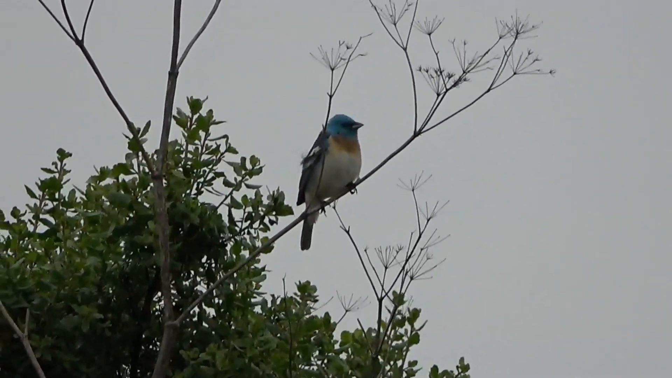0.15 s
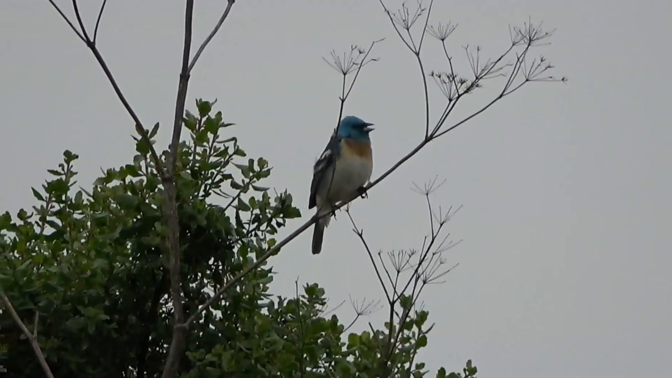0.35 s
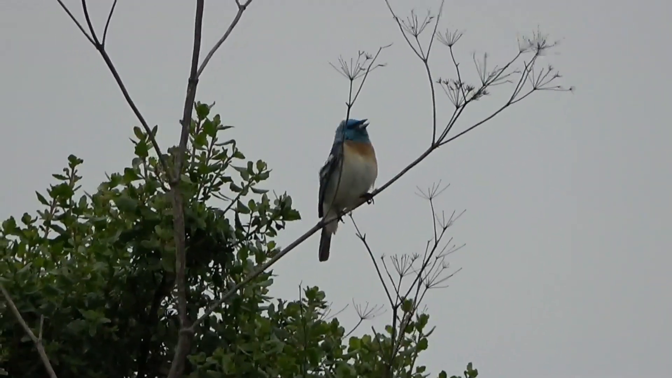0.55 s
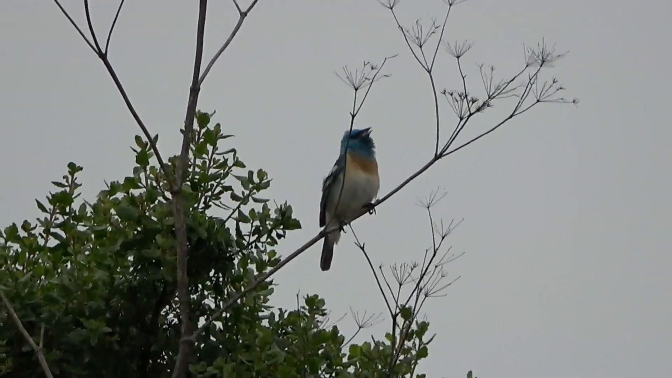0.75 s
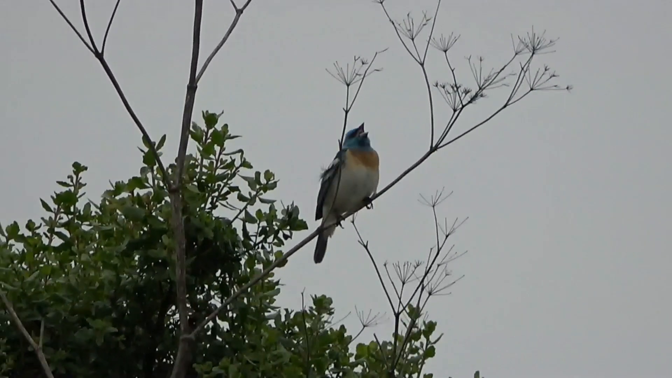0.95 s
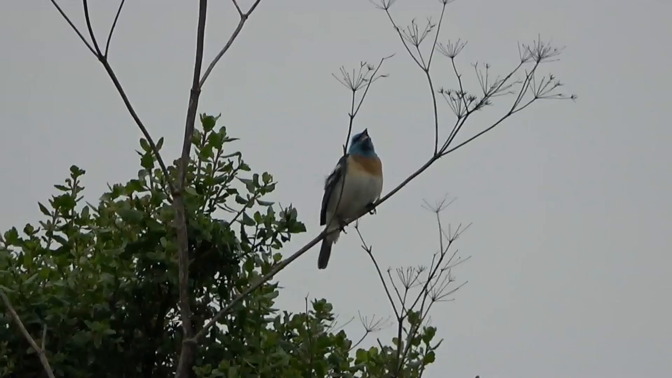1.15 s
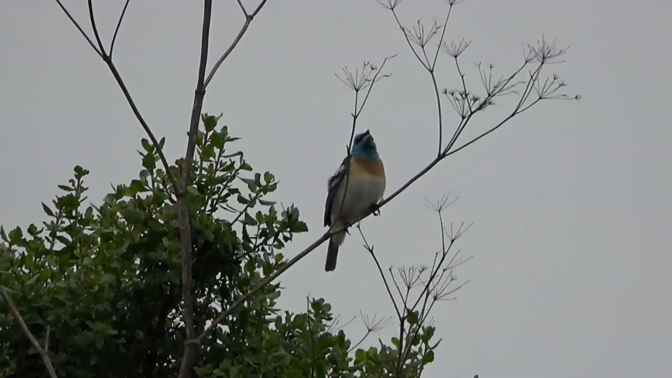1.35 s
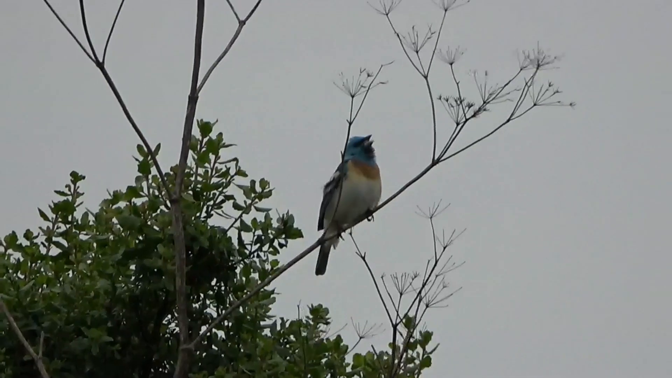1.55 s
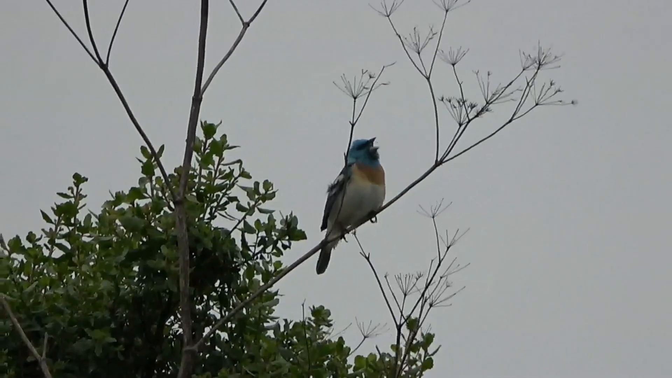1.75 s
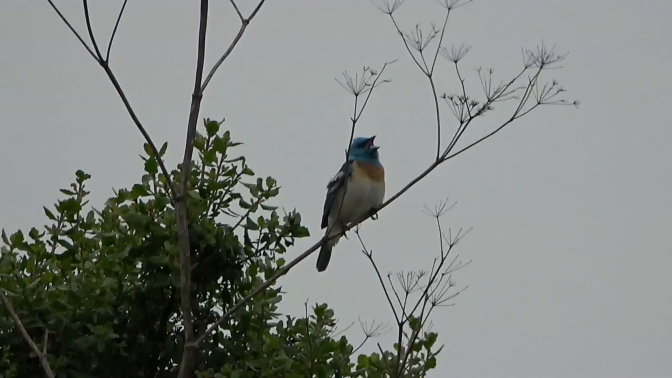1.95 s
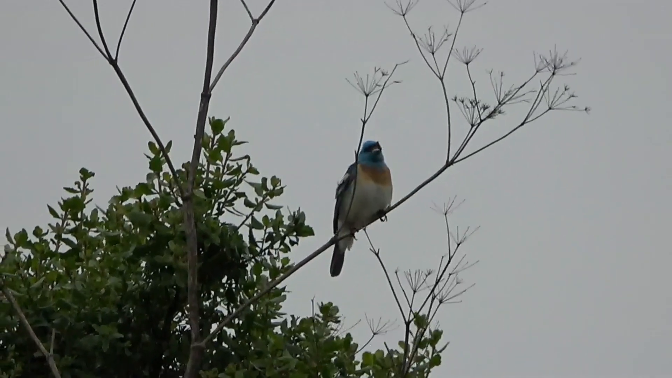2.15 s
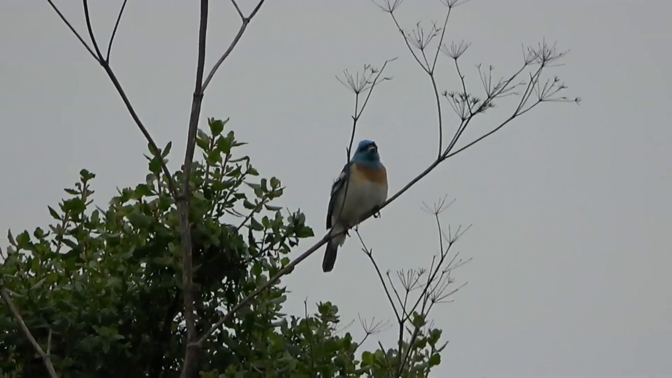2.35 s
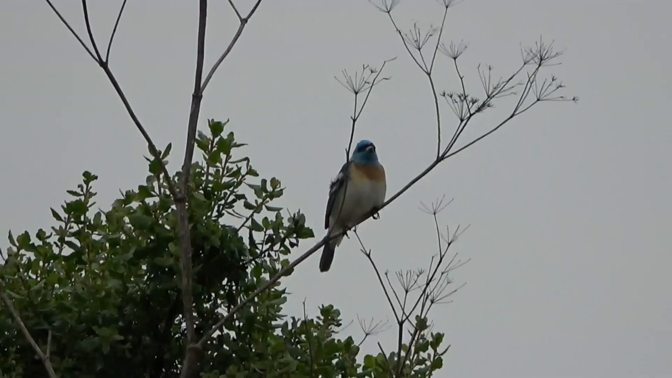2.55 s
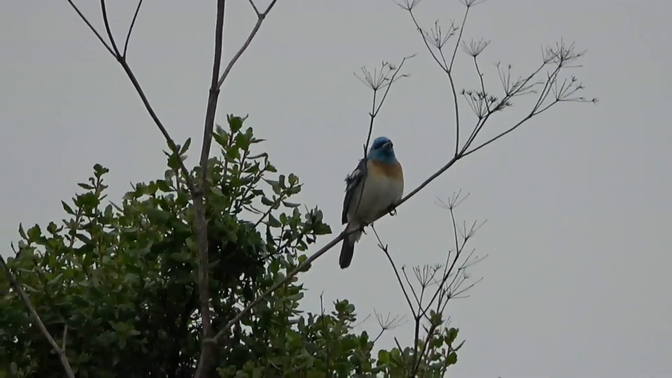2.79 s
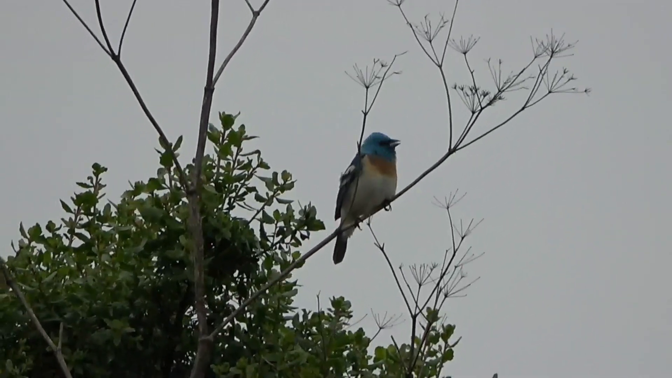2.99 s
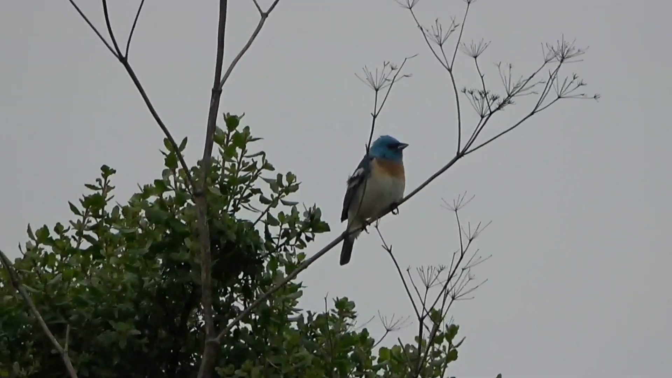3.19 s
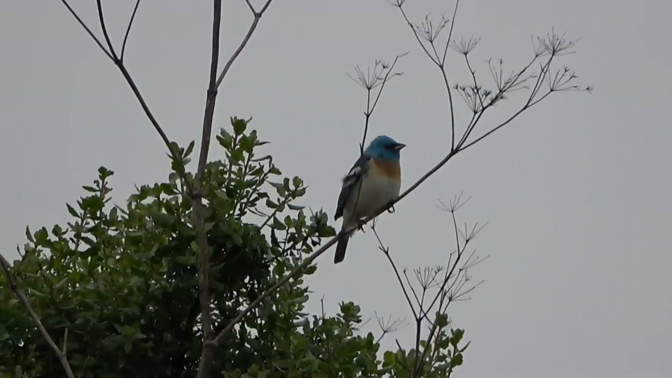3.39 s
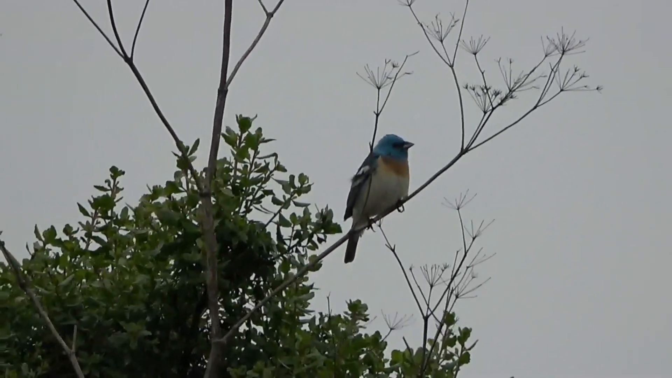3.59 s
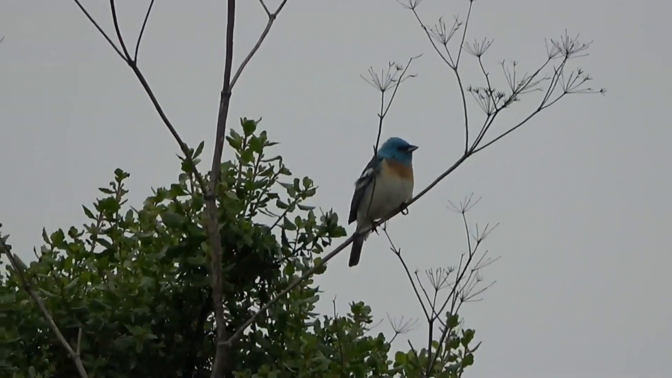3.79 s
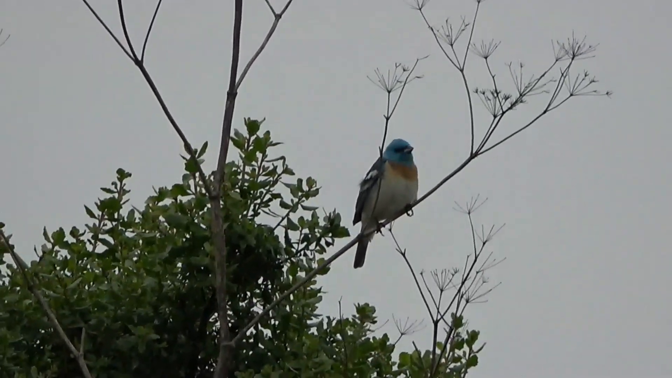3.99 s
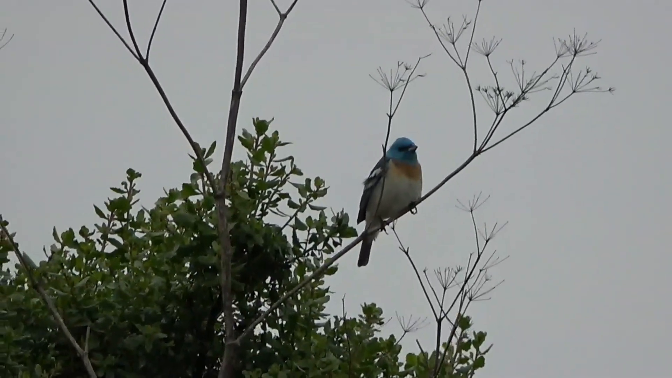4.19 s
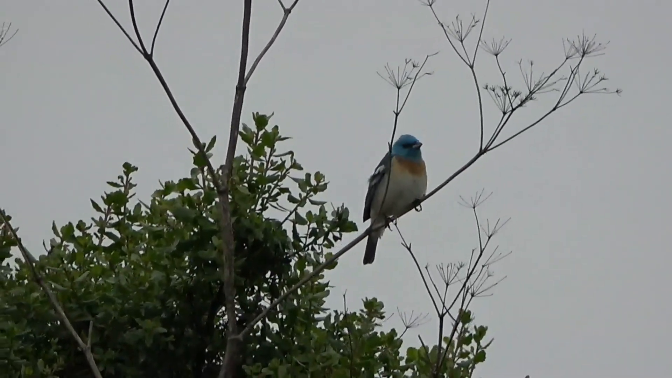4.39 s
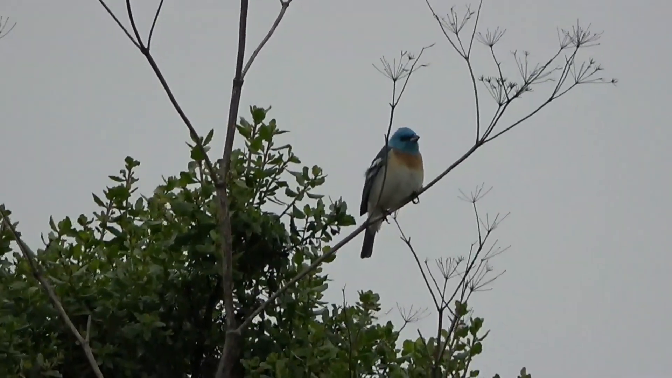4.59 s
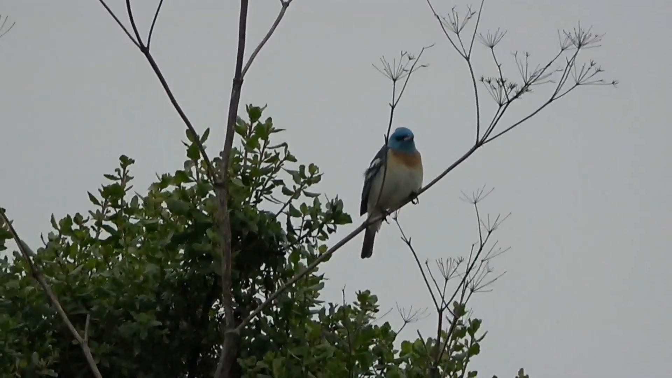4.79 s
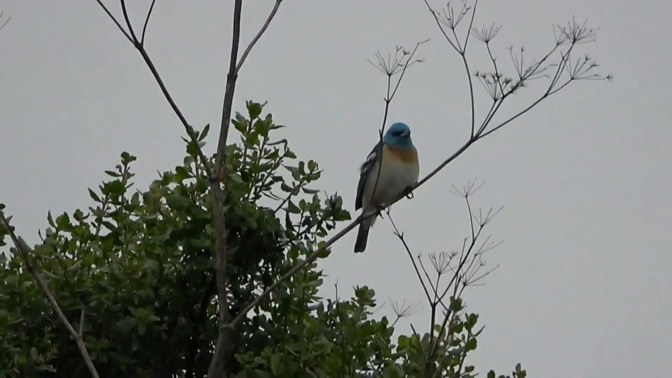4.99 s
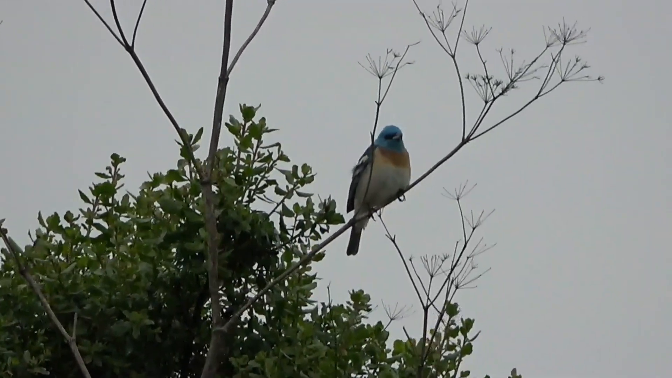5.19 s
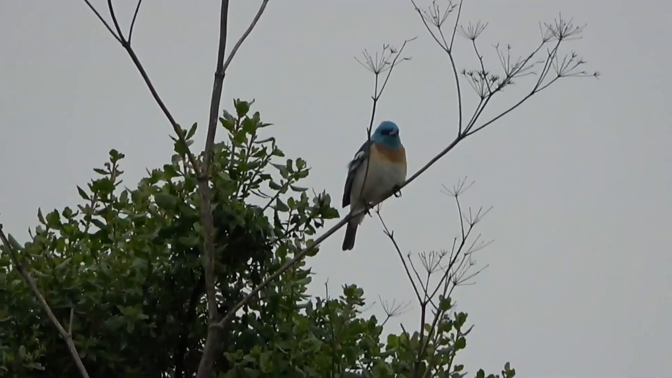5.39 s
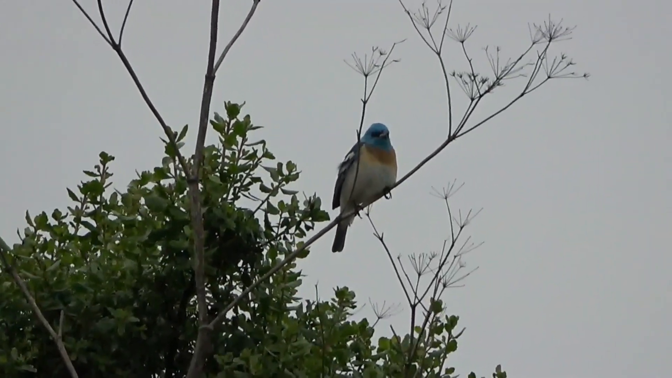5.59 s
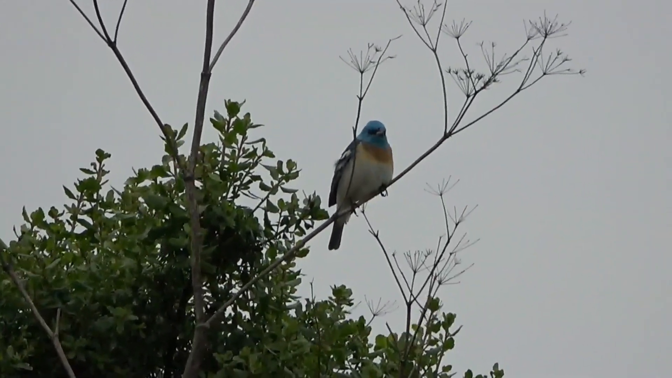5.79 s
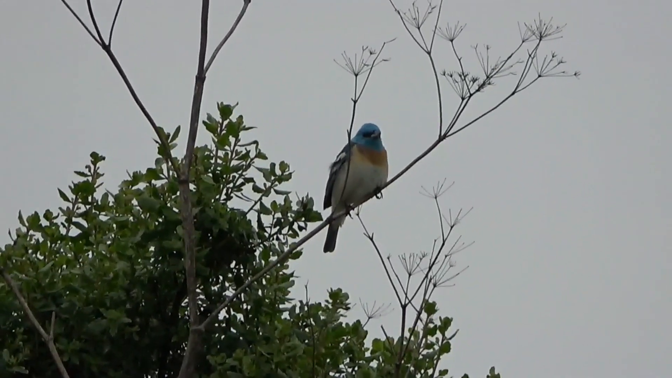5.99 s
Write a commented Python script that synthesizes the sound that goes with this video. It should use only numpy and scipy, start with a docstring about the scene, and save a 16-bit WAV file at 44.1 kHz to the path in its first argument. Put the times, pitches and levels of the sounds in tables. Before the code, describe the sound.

A small songbird sings a fast jumble of high sweeps, trills and buzzes, then a softer second song, over gusty wind rumbling on the microphone.

```python
"""Open scrub with a perch among branches, in gusty wind: a bunting sings a long jumble, then a softer song.
Its syllables are swept sines, some from both sides of the syrinx at once, returned by branches and bushes.
For the second song the head is turned: it leans to the right and comes back more from the bushes.
Another bird whistles far off (falling sines), a hoarse band of noise swells once in the distance,
gusts rumble on the microphone as octaves of noise, and a small knock close by rings damped modes."""
import sys
import numpy as np
from scipy import signal
from scipy.fft import rfft, irfft
from scipy.io import wavfile
from scipy.ndimage import uniform_filter1d, map_coordinates

SR = 44100
rng = np.random.default_rng(int(sys.argv[2]) if len(sys.argv) > 2 else 0)


def output_pcm(signal):
    """Save a mono or channel-first signal as 16-bit PCM at the path in sys.argv[1].

    Samples are clipped to [-1, 1] before scaling.
    """
    pcm = np.clip(np.atleast_2d(signal).T, -1, 1) * 32767
    wavfile.write(sys.argv[1], SR, np.round(pcm).astype(np.int16))


N = 266584


def from_db(db):
    """Decibels become an amplitude factor."""
    return 10 ** (np.asarray(db) / 20)


def rms_one(x):
    """Scale a sound to an rms of 1."""
    return x / np.sqrt(np.mean(x ** 2) + 1e-20)


def add(track, start_s, sound):
    """Mix a sound into a track."""
    i = max(round(start_s * SR), 0)
    track[i:i + len(sound)] += sound[:max(N - i, 0)]


def pan(x, left_db):
    """Make the left channel louder than the right by left_db."""
    return x * from_db([[left_db / 2], [-left_db / 2]])


def drift(per_s, size):
    """Smooth random wander of spread about 1, with per_s random points a second."""
    steps = np.arange(size) * per_s / SR
    return map_coordinates(rng.standard_normal(4096), [steps], order=3, mode="wrap")


def noise(spectrum, side_db):
    """Stereo noise of a given colour, mostly alike in both channels; rms 1."""
    hz, db = np.transpose(spectrum)
    bins = np.maximum(np.arange(N // 2 + 1) * SR / N, 1)
    colour = from_db(np.interp(np.log(bins), np.log(hz), db))
    mid, side = irfft(rfft(rng.standard_normal((2, N))) * colour, N)
    return rms_one(mid + from_db(side_db) * side * [[1], [-1]])


def scrub(x, wet_db, t60=0.28, twig_db=-22):
    """Nearby twigs scatter the sound at once; the bushes around return a faint longer tail."""
    twig_t60 = 0.025
    t = np.arange(SR // 2) / SR
    twigs = from_db(twig_db - 60 * t / twig_t60) / np.sqrt(twig_t60)
    bushes = from_db(wet_db - 60 * t / t60) / np.sqrt(t60)
    scale = np.sqrt(2 * np.log(1000) / SR)
    mid, side = rng.standard_normal((2, len(t))) * (twigs + bushes) * scale
    # leaves and twigs return short waves best
    short_waves = signal.butter(1, 3500, "high", fs=SR, output="sos")
    echoes = signal.sosfilt(short_waves, mid + 0.5 * side * [[1], [-1]])
    return x + signal.fftconvolve(x[None], echoes, axes=1)[:, :N]


def whistle(hz, db, overtone_db, undertone_db=-70, shimmer_db=2.0, edge_s=0.00097,
            rasp_db=-35, rasp_flicker_db=4, break_db=6, fifth_db=-8):
    """One voice: a near sine with slight tremor, faint octave and quick edges; half-pitch lines make it hoarse."""
    size = len(hz)
    tremor = 0.004  # share of the pitch
    phase = 2 * np.pi * np.cumsum(hz * (1 + tremor * drift(714, size))) / SR
    overtone = from_db(overtone_db) * np.sin(2 * phase) * (hz < SR / 4)
    half_lines = np.sin(phase / 2) + from_db(fifth_db) * np.sin(phase + phase / 2)
    # the half-pitch lines come and go in spurts
    undertone = from_db(undertone_db + break_db * np.tanh(drift(152, size))) * half_lines
    tone = np.sin(phase) + overtone + undertone
    # the air jet roughens the tone in short spurts
    rasp = from_db(rasp_db + rasp_flicker_db * drift(183.5, size)) * drift(8000, size)
    to_edge_s = np.minimum(np.arange(size), np.arange(size)[::-1]) / SR
    gate = np.sin(np.pi / 2 * np.minimum(to_edge_s / edge_s, 1)) ** 2
    return tone * (1 + rasp) * gate * from_db(db + shimmer_db * drift(297.2, size))


def syllables(shape, cues, overtone_db=-40, **timbre):
    """A learnt gesture is repeated: each cue stretches its time, scales its pitch and offsets its level."""
    out = np.zeros(N)
    s, hz, db = np.transpose(shape)
    for start, length, ratio, gain_db in cues:
        along = np.linspace(s[0], s[-1], max(int(length * SR), 2))
        # muscles round the corners
        pitch = uniform_filter1d(np.interp(along, s, hz), size=90, mode="nearest")
        level_db = gain_db + np.interp(along, s, db)
        add(out, start, whistle(ratio * pitch, level_db, overtone_db, **timbre))
    return out


# colour of the steady outdoor background: f/Hz, relative level/dB
AIR_COLOUR = [(180, -6.5), (300, -15.5), (437, -4), (730, -4), (957, -12.5), (1350, -11.5), (1570, -19.5),
              (2670, -22.5), (11000, -23.5), (14300, -72)]


def air():
    """Steady outdoor background: coloured noise, wide in stereo."""
    return from_db(-56) * noise(AIR_COLOUR, side_db=-8.5)


# low wind noise between gusts, its deep part thinned near 0.92 s:
# t/s, level/dB, tilt/dB per octave from 180 Hz (wind() steepens it below)
LOW_WIND_COURSE = [(0, -49.5, -2.5), (0.921, -47.5, 9), (1.2, -48.5, -3), (2.1, -47.5, -5.5),
                   (2.5, -55.5, -6.5), (3.1, -44, 0.5), (4.502, -47.5, 0.5), (6.04, -50, 0.5)]
# gusts; small eddies tilt them bright, big ones deep:
# start t/s, hold t/s, level/dB, tilt/dB per octave from 180 Hz (wind() steepens it below)
GUST_CUES = [(0.095, 0.14, -50, -8), (0.346, 0.22, -38, -6), (0.572, 0.074, -26, 2),
             (0.701, 0.073, -23.5, 4.5), (0.798, 0.053, -28.5, 2.5), (1.701, 0.077, -43, -6),
             (1.838, 0.069, -31, 0.5), (1.991, 0.042, -34.5, -3.5), (2.249, 0.11, -37.5, 2.5),
             (2.696, 0.018, -33, -4), (2.942, 0.062, -35, 0), (3.169, 0.032, -33.5, 3.5),
             (3.23, 0.057, -27.5, 5.5), (3.481, 0.14, -40, 3), (3.636, 0.16, -35.5, 6),
             (3.948, 0.23, -44.5, 4), (4.12, 0.017, -26.5, 6), (4.17, 0.21, -35, 3),
             (4.618, 0.053, -44.5, -4.5), (4.722, 0.041, -36.5, -2), (4.849, 0.084, -40.5, 2),
             (5.45, 0.11, -35, 2.5), (5.598, 0.074, -40.5, 2.5), (5.818, 0.022, -42.5, 5)]


def airflow_db(t, tilt_octaves, attack_s=0.038, release_s=0.032, sag_db_per_s=11.5):
    """Strength of one octave of wind noise: the low wind plus every gust with attack, sagging hold, release."""
    s, db, tilt = np.transpose(LOW_WIND_COURSE)
    power = from_db(np.interp(t, s, db + tilt * tilt_octaves)) ** 2
    for start, length, db, tilt in GUST_CUES:
        age = t - start
        # a gust swells or dies by 20 dB in one attack or release time
        outside = np.maximum(-age, 0) / attack_s + np.maximum(age - length, 0) / release_s
        shape_db = -20 * np.minimum(outside, 10) - sag_db_per_s * np.clip(age, 0, length)
        power = power + from_db(db + tilt * tilt_octaves + shape_db) ** 2
    return 10 * np.log10(power)


# octaves of turbulence: centre f/Hz, level/dB re airflow, left minus right level/dB
EDDY_OCTAVES = [(33.8, -24.5, -2), (77.6, -8.5, 2), (143.1, -4, 4), (260, -7.5, 6.5), (495, -21.5, 3),
                (1040, -52.5, 15.5)]
# single eddies that hit the microphone: t/s, peak level/dB before panning and the low-pass, f/Hz
BUFFET_CUES = [(0.597, -15, 144), (.613, -18, 185), (.701, -10.5, 205), (0.761, -14.5, 246),
               (1.837, -14, 124), (1.881, -14, 152), (2.714, -23, 118), (3.261, -21, 332)]


def wind(lumpy_db=3.0, side_db=-21, top_octaves=1.0, depth=1.62):
    """Octaves of turbulence swell with each gust; the hardest eddies arrive as a single push and pull."""
    t, out = np.arange(N) / SR, np.zeros((2, N))
    coarse_t = t[::40]
    lumps_db = lumpy_db * drift(80, N)
    for hz, db, left_db in EDDY_OCTAVES:
        octave = signal.butter(2, [hz / np.sqrt(2), hz * np.sqrt(2)], "band", fs=SR, output="sos")
        mid, side = rms_one(signal.sosfilt(octave, rng.standard_normal((2, N))))
        octaves = min(np.log2(hz / 180), top_octaves)
        # the deepest octaves depend most on the size of the eddies
        tilt_octaves = min(octaves, depth * octaves)
        flow_db = np.interp(t, coarse_t, airflow_db(coarse_t, tilt_octaves))
        rumble = mid + from_db(side_db) * side * [[1], [-1]]
        out += pan(from_db(db + flow_db + lumps_db) * rumble, left_db)
    for at, db, hz in BUFFET_CUES:
        u = np.clip(2 * np.pi * hz * (t - at), -10, 10)
        push_pull = u * np.exp((1 - u * u) / 2)
        out -= pan(from_db(db) * push_pull, left_db=3.5)
    return signal.sosfilt(signal.butter(2, 1300, fs=SR, output="sos"), out)


def far_rasp(hz=2050, at_s=3.46, spread_s=0.19, db=-69):
    """A faint hoarse band of noise swells and fades in the distance."""
    band = noise([(hz / 2, -45), (hz, 0), (hz * 2, -45)], side_db=-12)
    return band * from_db(db) * np.exp(-((np.arange(N) / SR - at_s) / spread_s) ** 2 / 2)


# whistles of a distant bird: start t/s, length t/s, first f/Hz, last f/Hz, level/dB at mid-whistle
FAR_WHISTLE_CUES = [(4.241, 0.07, 2220, 2160, -61.5), (4.382, 0.05, 3480, 3320, -68),
                    (4.666, 0.059, 2660, 2450, -65.5), (4.712, 0.03, 2060, 1950, -66),
                    (5.042, 0.1, 3450, 2920, -64.5)]


def far_bird(taper_db=9):
    """Another bird's plain falling whistles, each swelling and fading."""
    out = np.zeros(N)
    for start, length, first_hz, last_hz, db in FAR_WHISTLE_CUES:
        along = np.linspace(-1, 1, int(length * SR))
        hz = np.geomspace(first_hz, last_hz, len(along))
        add(out, start, whistle(hz, db - taper_db * along ** 2, overtone_db=-40))
    return out


# two strikes of a small hard knock: t/s, level/dB added to the modes
KNOCK_STRIKES = [(2.33, -19.5), (2.3341, -28)]
# modes of the knocked object: f/Hz, level/dB, t60/s
KNOCK_RING = [(450, -9, 0.013), (704, -2.5, 0.032), (880, -3.5, 0.025), (1193, -1.5, 0.028),
              (1760, -2, 0.015), (2870, -6.5, 0.0098), (3850, -2, 0.012), (6900, 13.5, 0.00057)]


def knock():
    """A short tap rings a few quickly damped modes."""
    out, t = np.zeros(N), np.arange(SR // 10) / SR
    ring = np.zeros(len(t))
    for k, (hz, db, t60) in enumerate(KNOCK_RING):
        ring += (-1) ** k * from_db(db - 60 * t / t60) * np.sin(2 * np.pi * hz * t)
    for s, db in KNOCK_STRIKES:
        add(out, s, from_db(db) * ring)
    return out


# Shapes of plain syllables: t/s, f/Hz, level/dB, all before the cue's stretch, ratio and gain
DIP_SHAPE = [(0.0, 6640, -24.5), (0.032, 5590, 0.5), (0.052, 4730, -5), (0.063, 3680, -2.5),
             (0.069, 3720, -5), (0.077, 5220, -2), (0.088, 5740, -18)]
SLUR_SHAPE = [(0.0, 6740, -22), (0.018, 7180.0, -9), (0.034, 7460.0, -17), (0.048, 6400.0, -8.5),
              (0.068, 5700.0, 4), (0.082, 5400.0, -2), (0.094, 5400.0, -24)]
CHIP_SHAPE = [(0.0, 5010, -10.5), (0.014, 5102, -4), (0.025, 4130.0, -13), (0.035, 3323, -25)]
FALL_SHAPE = [(0, 7560, -22), (.018, 6600, -4.5), (.034, 5060, 1), (.048, 4000, -1), (.064, 3550, -1),
              (.095, 3083, -16.5), (.11, 2550, -24)]
DROP_SHAPE = [(0.0, 5390, -15.5), (0.012, 5050, -4), (0.025, 4560, 2.5), (0.037, 3600, -3),
              (0.044, 3140, -21)]
HIGH_SLUR_SHAPE = [(0.0, 6640, -21), (0.011, 7960, -9), (0.026, 7400, -32), (0.04, 6560, -11.5),
                   (0.058, 6260, -1.5), (0.072, 5850, -11.5), (0.082, 5880, -5.5)]
STEEP_FALL_SHAPE = [(0.0, 7480, -25), (0.01, 6730.0, -7), (0.02, 5520.0, -5.5), (0.033, 4400, -4),
                    (0.05, 3820.0, -19), (0.075, 3070, -14.5), (0.092, 2650, -40)]
# short opening curl before the sawtooth trill, same columns
CURL_SHAPE = [(0, 5600, -28), (.012, 6300, -7), (.023, 6700, 5.5), (.029, 6600, -11)]
# When they are sung: start t/s, length t/s, f ratio, gain/dB
DIP_CUES = [(0.101, 0.086, 1, -39.5)]
SLUR_CUES = [(0.263, 0.1, 1, -41.5), (.492, 0.095, 1, -29.5)]
CHIP_CUES = [(0.406, 0.035, 0.95, -28)]
FALL_CUES = [(0.72, 0.12, 1.06, -24.5), (1.012, 0.1, 1.036, -23.5)]
DROP_CUES = [(4.463, 0.03, 0.94, -51.5), (4.583, 0.036, 1.03, -46), (4.697, 0.032, 1.02, -42.5),
             (4.925, 0.042, 0.962, -40), (5.157, 0.044, 0.91, -39)]
HIGH_SLUR_CUES = [(4.801, 0.08, 0.99, -33.5), (5.049, 0.078, 0.98, -37), (5.273, 0.077, 0.97, -37.5)]
STEEP_FALL_CUES = [(5.521, 0.096, 0.978, -27.5), (5.806, 0.098, 1.025, -31.5)]
CURL_CUES = [(1.182, 0.031, 0.98, -29)]


def pure_syllables():
    """Clean swept whistles, near sines with only a faint octave."""
    pure = [(DIP_SHAPE, DIP_CUES), (SLUR_SHAPE, SLUR_CUES), (CHIP_SHAPE, CHIP_CUES),
            (FALL_SHAPE, FALL_CUES), (CURL_SHAPE, CURL_CUES), (DROP_SHAPE, DROP_CUES),
            (HIGH_SLUR_SHAPE, HIGH_SLUR_CUES), (STEEP_FALL_SHAPE, STEEP_FALL_CUES)]
    return sum(syllables(shape, cues) for shape, cues in pure)


# rising syllable, then the other voice's flick that opens it: t/s, f/Hz, level/dB before the cue
RISE_SHAPE = [(0, 3003, -33), (.012, 3950, -9), (.034, 4034, -5.5), (.061, 4465, -7), (.079, 5090, 0),
              (.097, 5820, -4.5), (.109, 5900, -18)]
ONSET_SHAPE = [(0, 3800, 3), (.007, 4620, 5), (0.015, 5300, -11)]
# rises: start t/s, length t/s, f ratio, gain/dB
RISE_CUES = [(0.628, 0.095, 1, -26), (0.897, 0.11, 0.99, -22), (5.402, 0.11, 1.02, -30),
             (5.694, 0.11, 0.96, -34.5)]


def rises(onset_db=-19):
    """One voice sweeps upward while the other opens the note with a weaker flick."""
    onset_s = ONSET_SHAPE[-1][0]  # the flick keeps its own length
    onset_cues = [(s, onset_s, ratio, db + onset_db) for s, length, ratio, db in RISE_CUES]
    return syllables(RISE_SHAPE, RISE_CUES) + syllables(ONSET_SHAPE, onset_cues)


# whip and hook shapes: t/s, f/Hz, level/dB before the cue
WHIP_SHAPE = [(0, 3050, -27), (.004, 5000, -5), (.008, 7266, -11.5), (.014, 5610, 0.5), (.024, 4720, -4),
              (.037, 3550, -3.5), (.045, 2940, -25), (.058, 2360, -30)]
HOOK_SHAPE = [(0.0, 2560, -26), (0.02, 3200, -16), (0.028, 3560, -5), (0.036, 3850, -1), (0.045, 3860, 1.5),
              (0.052, 4000, -15)]
# their cues: start t/s, length t/s, f ratio, gain/dB
WHIP_CUES = [(1.475, 0.065, 0.99, -18), (1.64, 0.06, 1.003, -17.5), (1.798, 0.063, 0.97, -20)]
HOOK_CUES = [(1.548, 0.049, 0.98, -18.5), (1.704, 0.045, 0.97, -21.5), (1.865, 0.046, 0.961, -22)]


def whips():
    """Steep falls, roughened by the air jet, alternate with steadier rising hooks."""
    return syllables(WHIP_SHAPE, WHIP_CUES, rasp_db=-27) + syllables(HOOK_SHAPE, HOOK_CUES, shimmer_db=1.3)


# peak, spike and arc shapes: t/s, f/Hz, level/dB before the cue
PEAK_SHAPE = [(0.0, 3440, -9), (0.009, 4010, -4.5), (0.014, 4800, 0.5), (0.018, 5640, -9),
              (0.022, 4690, -7), (0.027, 3780, 3), (0.034, 3030, -20), (0.04, 3040, -27),
              (0.046, 3750, -13)]
SPIKE_SHAPE = [(0.0, 3320, -14), (0.011, 3760, -6), (0.019, 4840, -4), (0.023, 6100, -10.5),
               (0.027, 4260.0, -5), (0.033, 2810, -18.5)]
ARC_SHAPE = [(0.0, 3520, -18.5), (0.015, 5190, -8), (0.024, 6020, -8), (0.034, 6100, -11.5),
             (0.045, 5420, -6.5), (0.057, 3840, -16)]
# their cues: start t/s, length t/s, f ratio, gain/dB
PEAK_CUES = [(2.651, 0.046, 0.99, -31.5), (2.773, 0.036, 1.03, -32)]
SPIKE_CUES = [(2.697, 0.032, 1.06, -25.5), (2.811, 0.034, 1.02, -25)]
ARC_CUES = [(3.037, 0.057, 0.987, -33.5), (3.105, 0.0514, 1.014, -33.5)]


def hoarse_syllables():
    """Up-and-down chirps and arcs gain half-pitch lines and jet roughness, the arcs most."""
    chirp_timbre = dict(overtone_db=-28, undertone_db=-37, rasp_db=-23)
    peaks = syllables(PEAK_SHAPE, PEAK_CUES, **chirp_timbre)
    spikes = syllables(SPIKE_SHAPE, SPIKE_CUES, **chirp_timbre)
    arcs = syllables(ARC_SHAPE, ARC_CUES, overtone_db=-32, undertone_db=-16, rasp_db=-20)
    return peaks + spikes + arcs


# strokes of the sawtooth trill: start t/s, foot f/Hz, top f/Hz, level/dB at mid-stroke
STROKES = [(1.2128, 5000, 6710, -21.5), (1.243, 4750, 6280, -17.5), (1.2748, 4550, 6020, -17.5),
           (1.307, 4370, 6160, -19.5), (1.34, 4150, 5880, -19), (1.3744, 4250, 5840, -20)]


def trill(end_s=1.4065, snap_s=0.00595, turn_loss_db=9, turn_s=0.0071, fade_s=0.0053, fade_db=-18):
    """One whistle climbs through each stroke and snaps back, weakest at the foot."""
    t = np.arange(STROKES[0][0], end_s, 1 / SR)
    starts, foot, top, level = np.transpose(STROKES)
    tops_s = np.append(starts[1:], end_s) - snap_s
    turns_s = np.column_stack([starts, tops_s]).ravel()
    turns_hz = np.column_stack([foot, top]).ravel()
    hz = uniform_filter1d(np.interp(t, turns_s, turns_hz), size=90, mode="nearest")
    to_foot_s = np.abs(t[:, None] - starts).min(axis=1)
    foot_loss_db = turn_loss_db * np.exp(-(to_foot_s / turn_s) ** 2)
    closing_db = fade_db * np.exp((t - end_s) / fade_s)
    db = np.interp(t, (starts + tops_s) / 2, level) - foot_loss_db + closing_db
    out = np.zeros(N)
    add(out, t[0], whistle(hz, db, overtone_db=-36.5, rasp_db=-40))
    return out


# one steep downward flick: t/s, f/Hz, level/dB before the cue
FLICK_SHAPE = [(0, 7220, -12), (.005, 5200, -4), (.009, 4050, 2.5), (.013, 3280, -28)]
# groups of three flicks after each drop: start t/s, gain/dB
STUTTER_CUES = [(4.486, -51), (4.612, -45.5), (4.724, -42), (4.966, -42), (5.196, -43)]


def stutters(spacing_s=0.0112, length_s=0.012, last_db=-6):
    """A drop breaks into three steep downward flicks, the last one weaker."""
    flicks = [(s + k * spacing_s, length_s, 1, db + last_db * (k == 2))
              for s, db in STUTTER_CUES for k in range(3)]
    return syllables(FLICK_SHAPE, flicks)


# buzzes: start t/s, length t/s, reference t/s that sets the warble's phase (may lie before the start),
# first and last centre f/Hz, first and last warble rate f/Hz,
# swing f/Hz before narrowing, wander and cusp, loss at the tops level/dB, level/dB before losses
BUZZ_CUES = [(1.959, 0.12, 1.86, 6190, 5694, 109.9, 91.7, 496, 5.9, -19),
             (2.503, 0.12, 2.5, 7580, 7750, 59.3, 46.3, 1050, 12, -27.5),
             (2.891, 0.112, 2.906, 7470, 7660, 54, 48, 1050, 17, -33.5)]


def buzzes(cusp=0.16, taper_db=14, narrowing=0.53, swing_wander=0.13):
    """The pitch warbles fast and slows, with pointed tops at which the tone weakens and turns ragged."""
    out = np.zeros(N)
    for (start, length, phase_ref_s, first_hz, last_hz, first_rate, last_rate,
         swing_hz, top_loss_db, peak_db) in BUZZ_CUES:
        size = int(length * SR)
        ends = np.abs(np.linspace(-1, 1, size)) ** 3
        cycles = np.cumsum(np.linspace(first_rate, last_rate, size)) / SR
        turn = 2 * np.pi * (cycles - first_rate * (phase_ref_s - start))
        swing = swing_hz * (1 - narrowing * ends) * (1 + swing_wander * drift(82, size))
        warble = np.cos(turn) + cusp * np.cos(2 * turn)
        hz = np.linspace(first_hz, last_hz, size) + swing * warble
        tops = ((1 + np.cos(turn)) / 2) ** 2
        ragged_db = 3 * drift(1200, size)
        db = peak_db - taper_db * ends - tops * (top_loss_db + ragged_db)
        add(out, start, whistle(hz, db, overtone_db=-33.0))
    return out


# upper voice's double arch, sung in one breath, and lower voice's arch: t/s, f/Hz, level/dB before the cue
UPPER_ARCH_SHAPE = [(0, 4250, -11.5), (.011, 6000, -0.5), (.019, 7250, -9.5), (.031, 7600, -10.5),
                    (.044, 7300, -13), (.058, 5700, -5.5), (.071, 4700, -0.5), (.082, 5700, -0.5),
                    (.092, 7300, -10.5), (.102, 7600, -12), (.114, 6850, -8.5), (.128, 5350, -11.5)]
LOWER_ARCH_SHAPE = [(0.0, 3420, -14), (0.01, 4770, 0.5), (0.024, 4910, -5.5), (0.039, 4380.0, -5.5),
                    (0.052, 3510, -18)]
# their cues: start t/s, length t/s, f ratio, gain/dB
UPPER_ARCH_CUES = [(2.138, 0.128, 1, -26), (2.301, 0.127, 1.007, -29.5)]
LOWER_ARCH_CUES = [(2.146, 0.058, 0.96, -32), (2.217, 0.048, 0.92, -35), (2.309, 0.059, 0.92, -36.5),
                   (2.385, 0.039, 0.96, -35.5)]


def two_voiced_arches():
    """Both sides of the syrinx sing arches at once; their product adds high sum tones."""
    upper = syllables(UPPER_ARCH_SHAPE, UPPER_ARCH_CUES, overtone_db=-31)
    lower = syllables(LOWER_ARCH_SHAPE, LOWER_ARCH_CUES, overtone_db=-16)
    # the high-pass keeps mainly the sums, not the differences
    high_pass = signal.butter(2, 7000, "high", fs=SR, output="sos")
    sum_tones = signal.sosfilt(high_pass, upper * lower)
    return upper + lower + from_db(27) * sum_tones


def bunting():
    """Pure, hoarse, trilled, buzzing and two-voiced syllables pass through one small throat and beak."""
    voice = (pure_syllables() + rises() + whips() + hoarse_syllables() + trill()
             + stutters() + buzzes() + two_voiced_arches())
    # the small throat and beak radiate little below the song's range
    return signal.sosfilt(signal.butter(6, 2300, "high", fs=SR, output="sos"), voice)


# branches by the perch: delay t/s, level/dB
BRANCHES = [(.0065, -22), (.008, -19)]


def near_echoes(x):
    """Branches return the song a few milliseconds late, so that fast sweeps beat against themselves."""
    out = x.copy()
    for delay_s, db in BRANCHES:
        add(out, delay_s, from_db(db) * x)
    return out


def turned_aside(x, low_hz=3800, high_hz=6000, low_left_db=-3.5, high_left_db=-10):
    """The sound leans to the right, the high notes more than the low ones."""
    bins = np.arange(N // 2 + 1) * SR / N
    left_db = np.interp(bins, [low_hz, high_hz], [low_left_db, high_left_db])
    return irfft(rfft(x) * from_db([left_db / 2, -left_db / 2]), N)


def scene():
    """The first song is aimed at the microphone; with the head turned, more of the second comes from bushes."""
    background = air() + wind() + far_rasp()
    distant = scrub(far_bird(), wet_db=-9)
    tap = pan(scrub(knock(), wet_db=-12.5), left_db=4.0)
    voice = near_echoes(bunting())
    facing = np.arange(N) < 4 * SR  # the head is turned from 4 s on
    first = pan(scrub(voice * facing, wet_db=-22.5, t60=0.4, twig_db=-11), left_db=0.7)
    second = turned_aside(scrub(voice * ~facing, wet_db=-17.5, t60=0.74, twig_db=-16.0))
    return background + distant + tap + first + second


def record(dry):
    """The treble is cut steeply above 11050 Hz."""
    return signal.sosfilt(signal.ellip(10, 0.2, 80, 11050, fs=SR, output="sos"), dry)


dry = scene()
out = record(dry)
output_pcm(out)
```